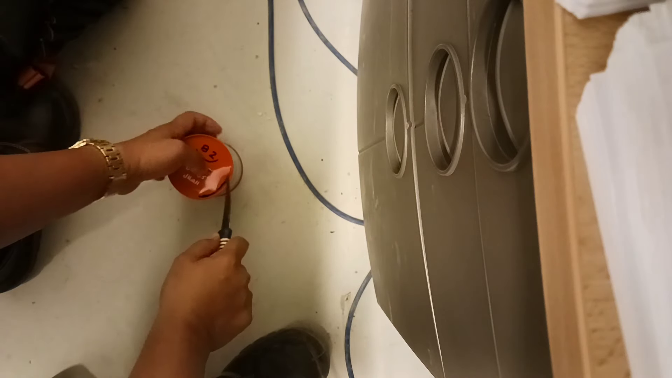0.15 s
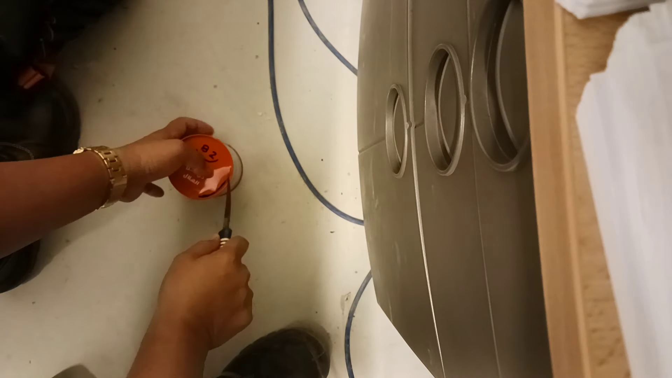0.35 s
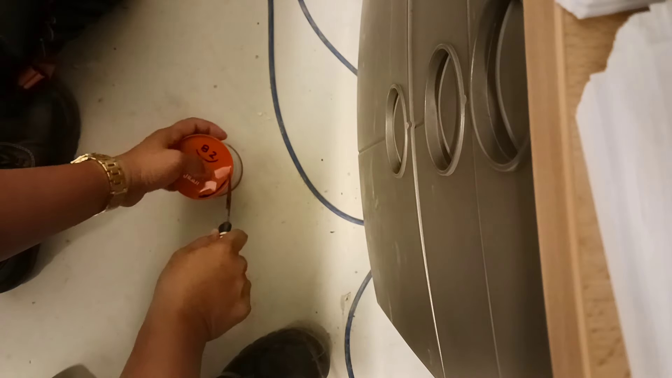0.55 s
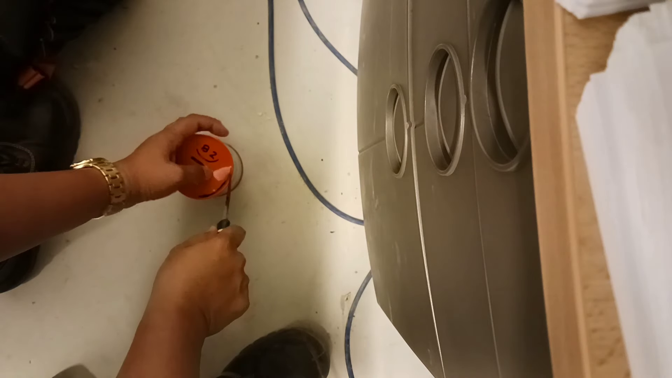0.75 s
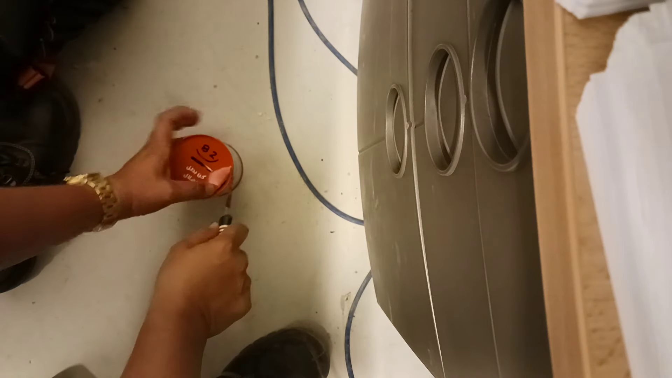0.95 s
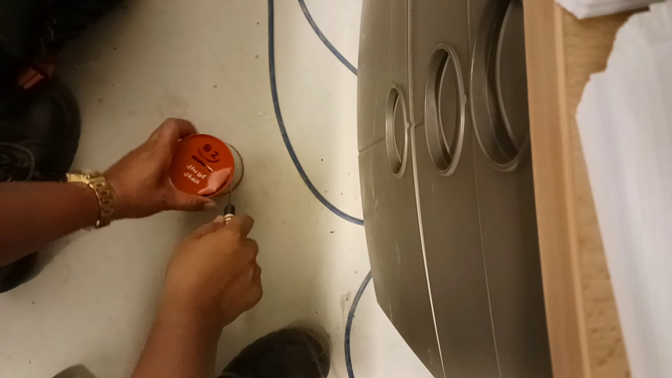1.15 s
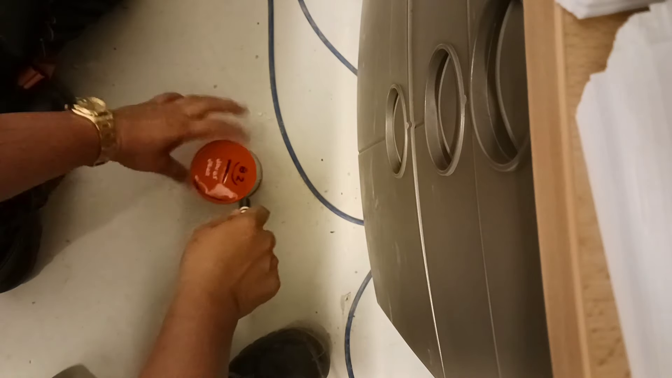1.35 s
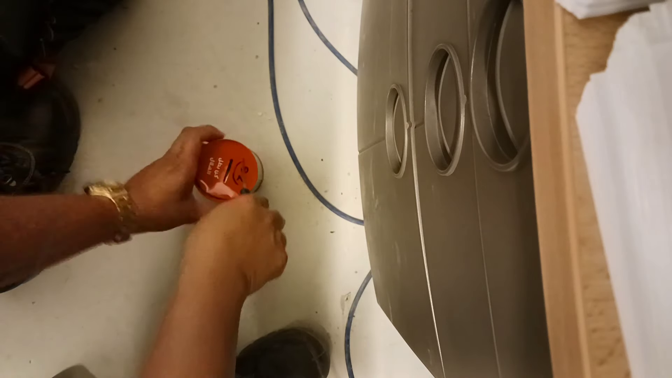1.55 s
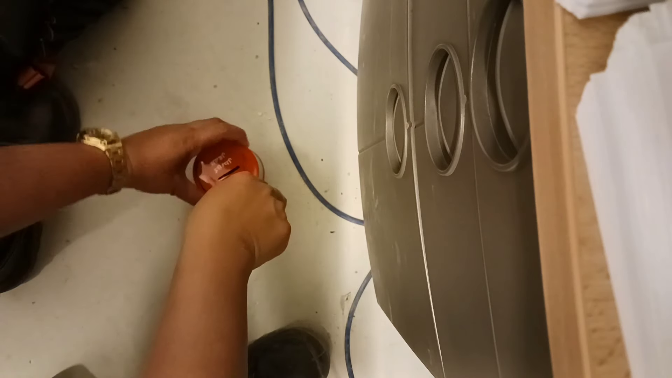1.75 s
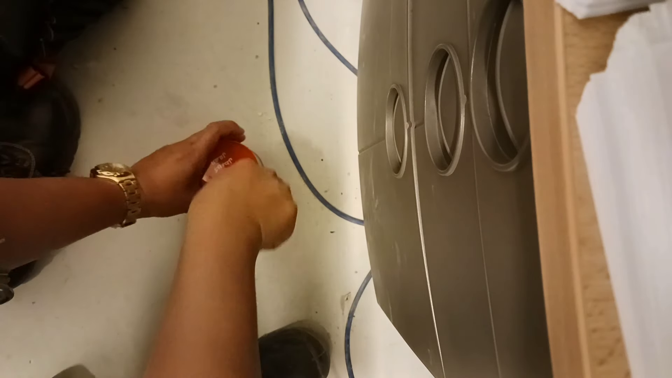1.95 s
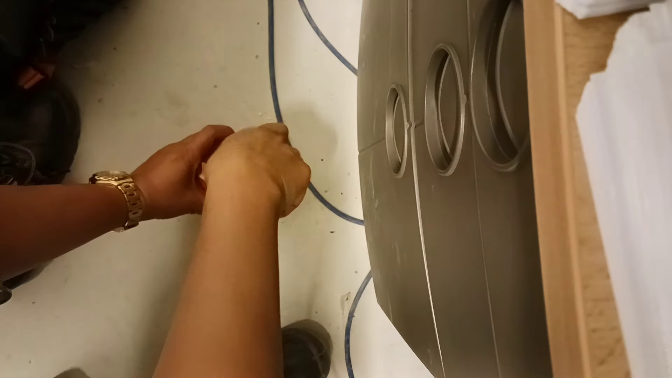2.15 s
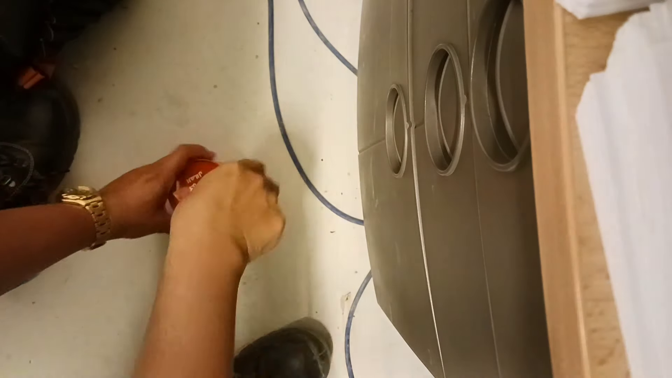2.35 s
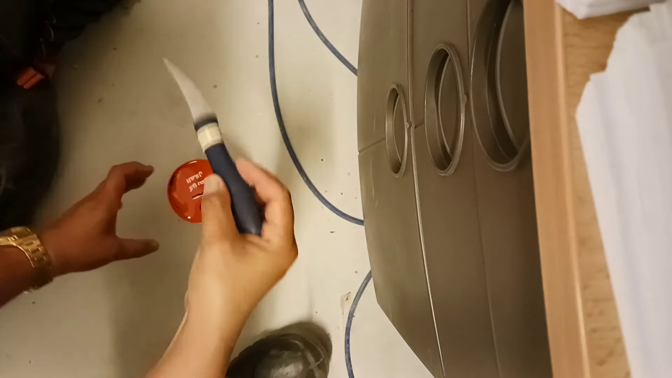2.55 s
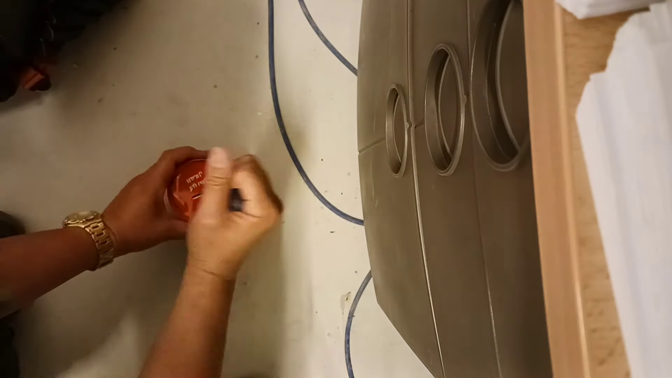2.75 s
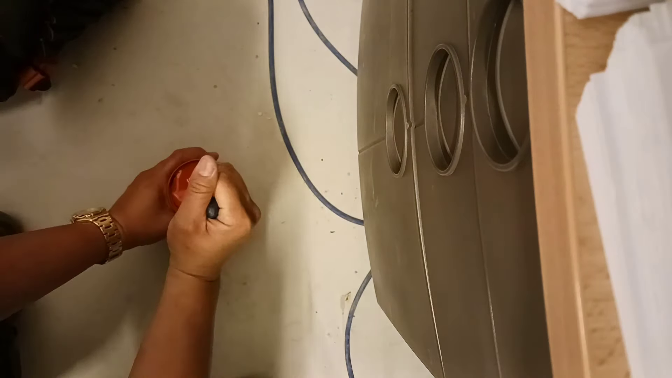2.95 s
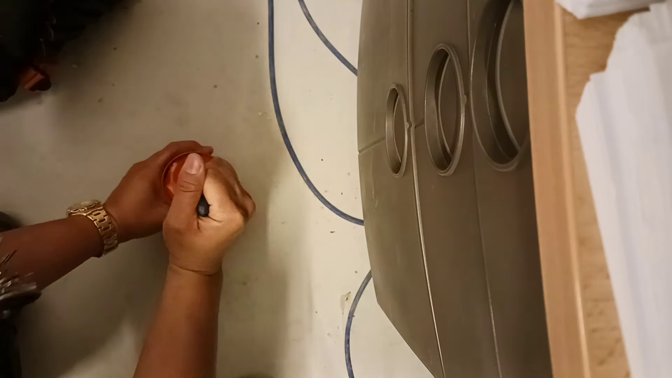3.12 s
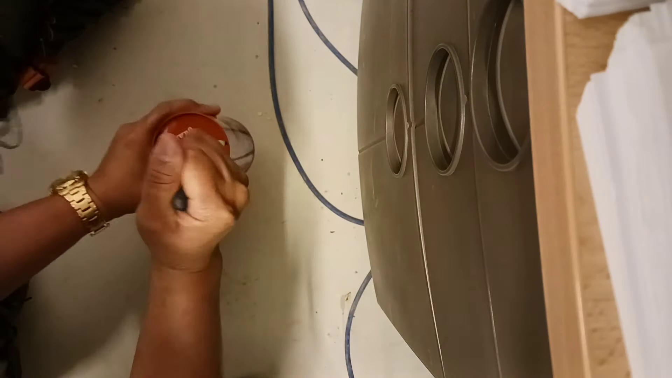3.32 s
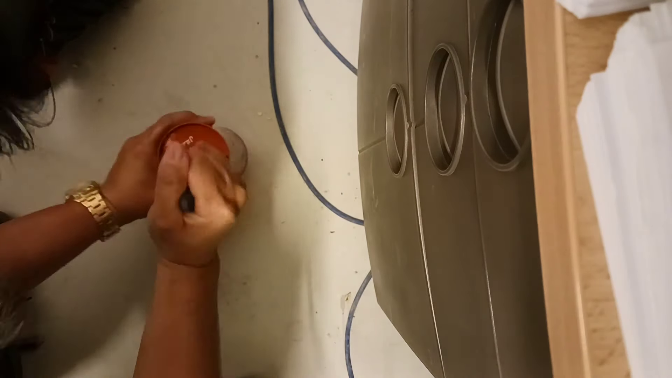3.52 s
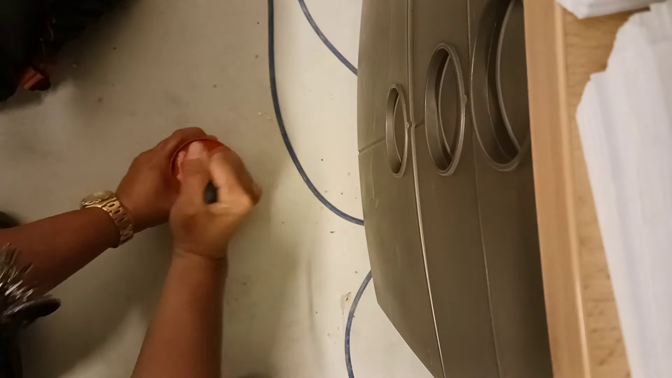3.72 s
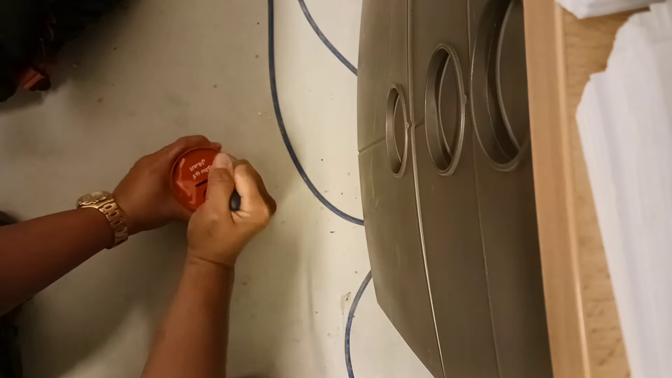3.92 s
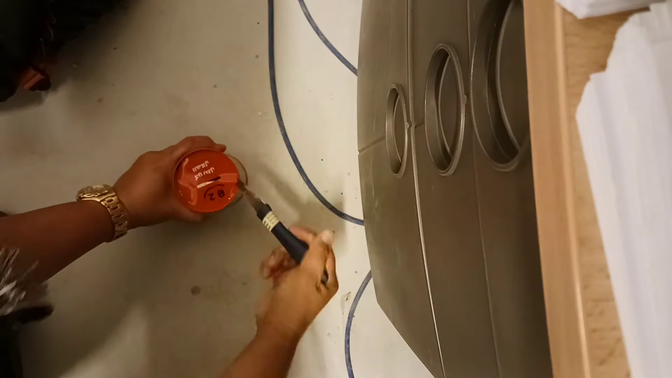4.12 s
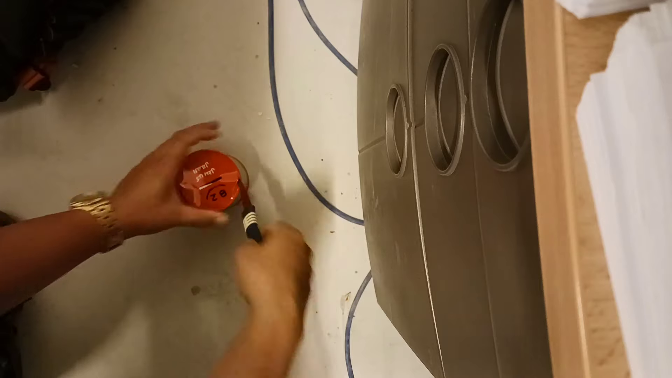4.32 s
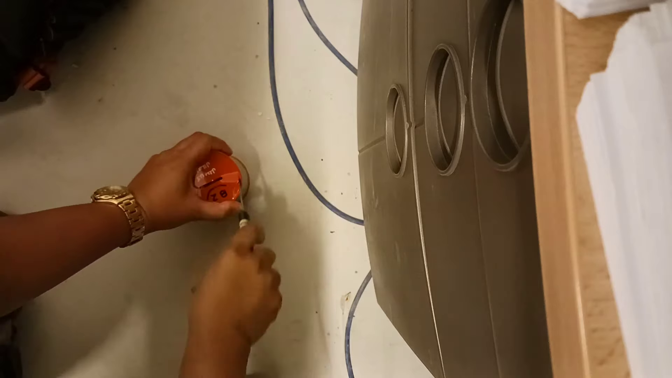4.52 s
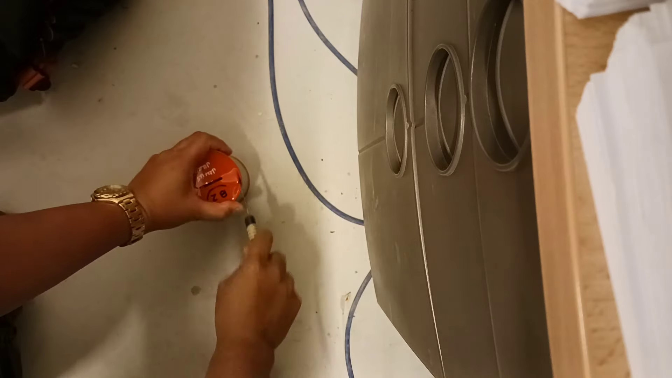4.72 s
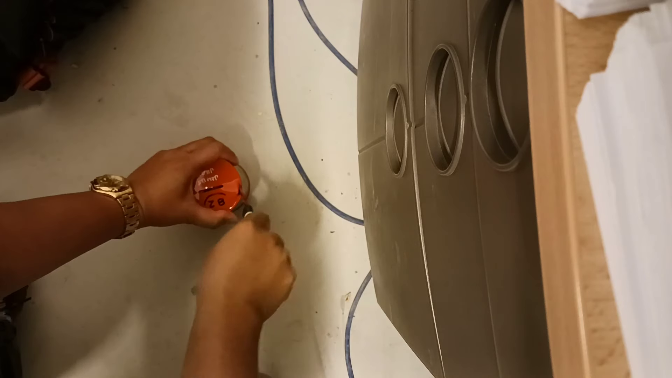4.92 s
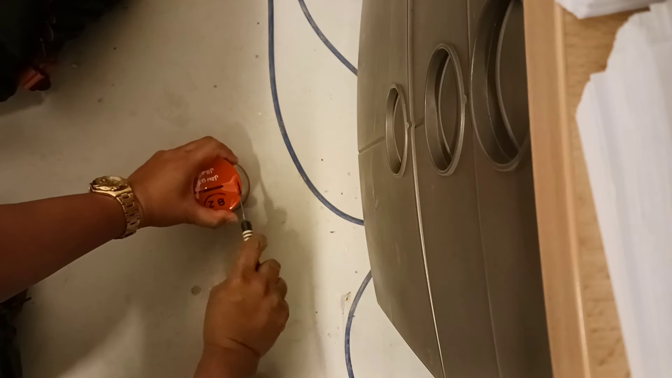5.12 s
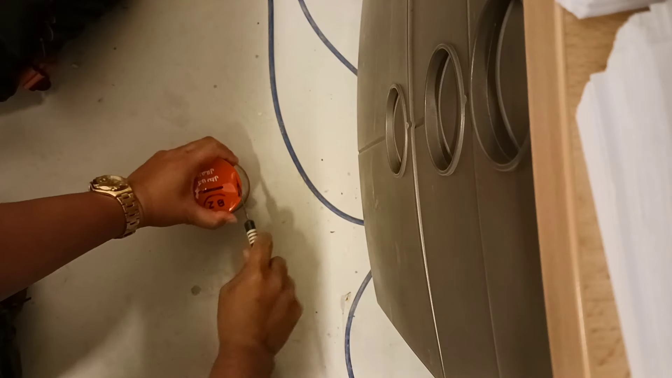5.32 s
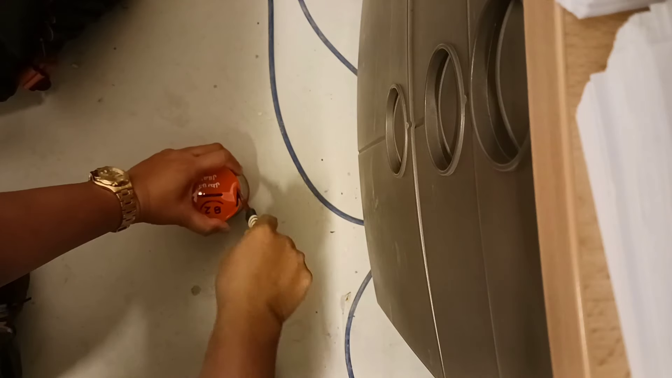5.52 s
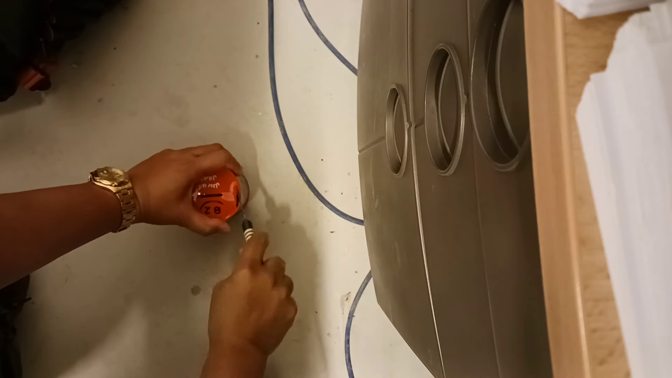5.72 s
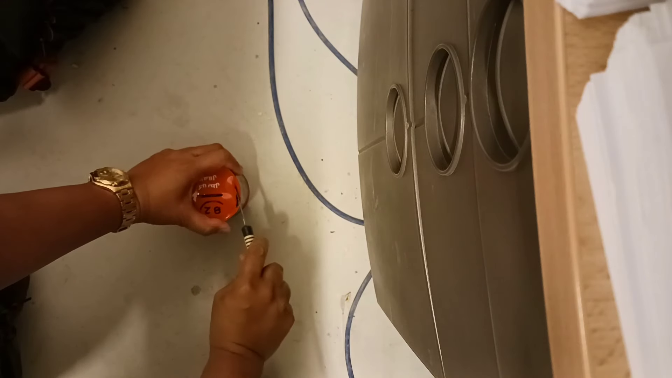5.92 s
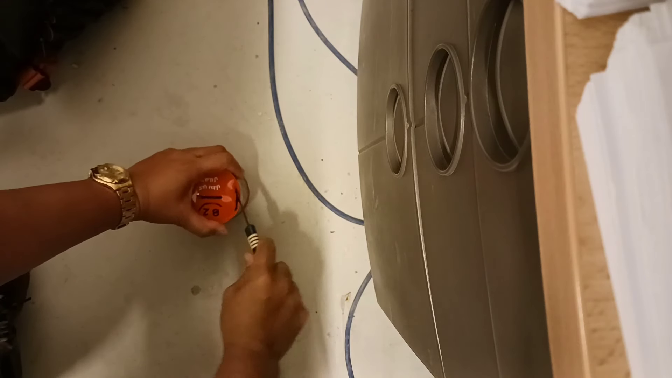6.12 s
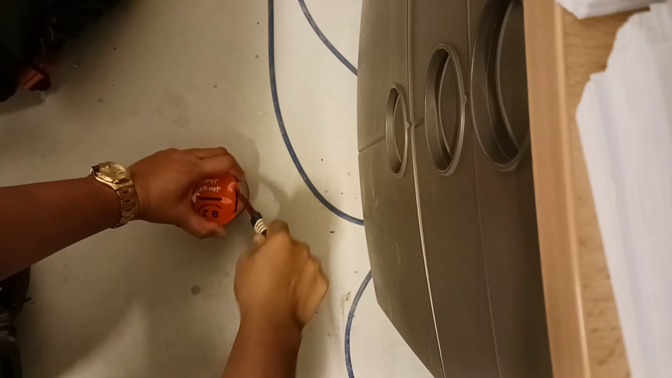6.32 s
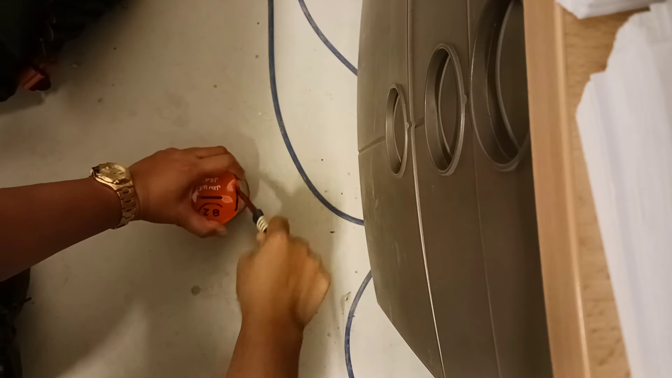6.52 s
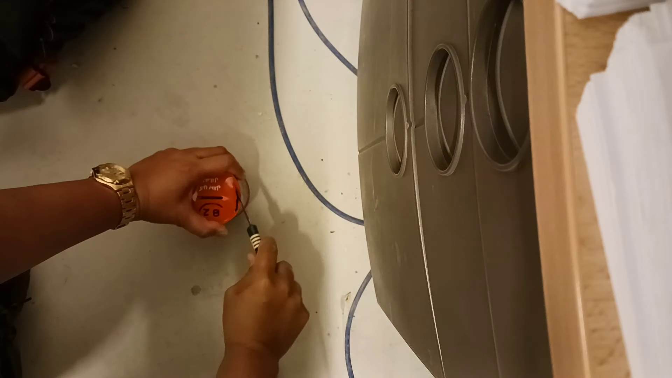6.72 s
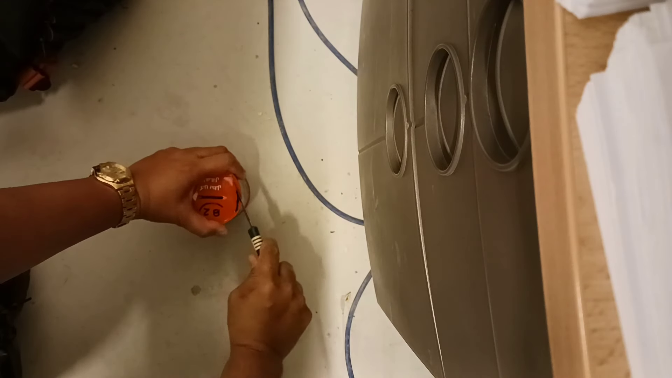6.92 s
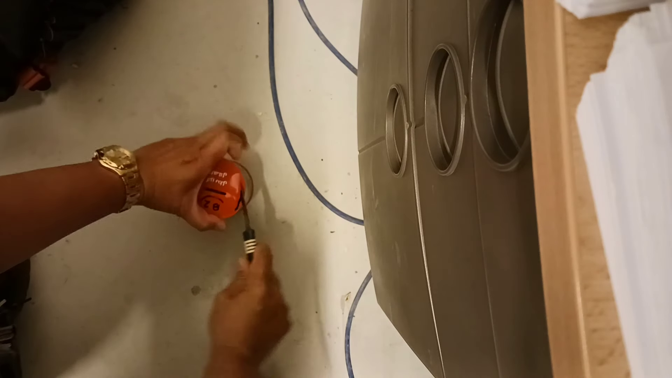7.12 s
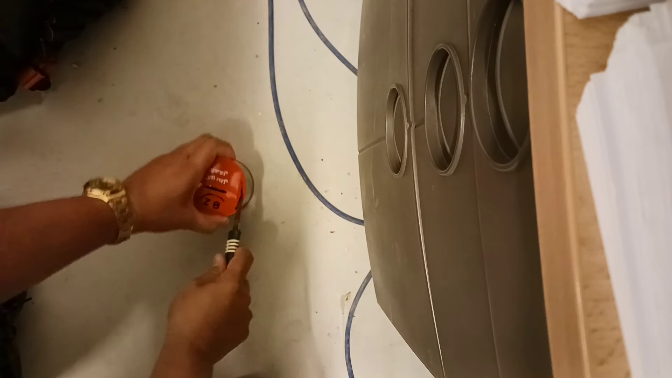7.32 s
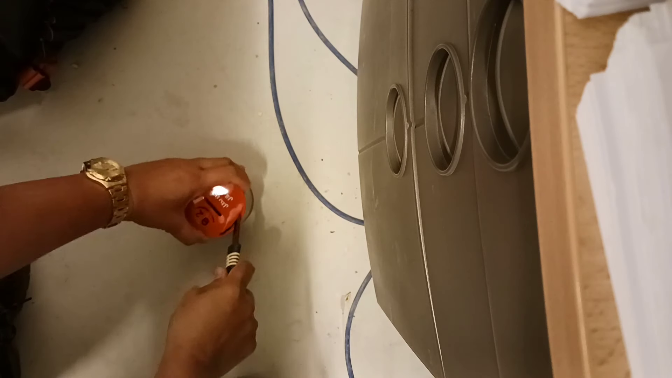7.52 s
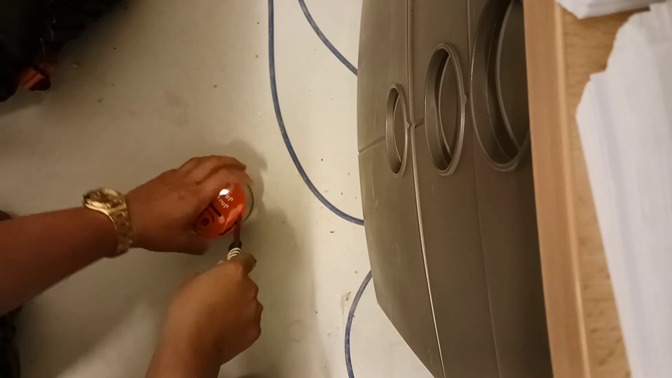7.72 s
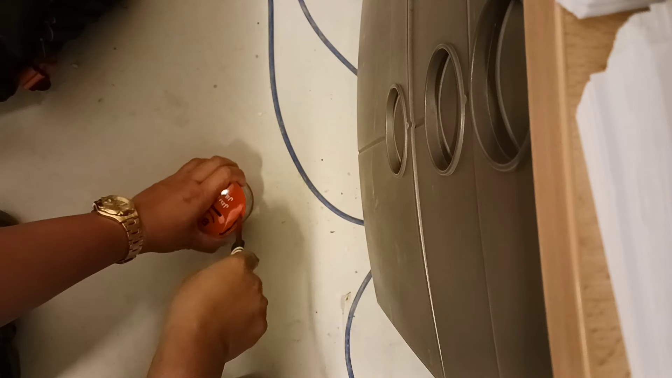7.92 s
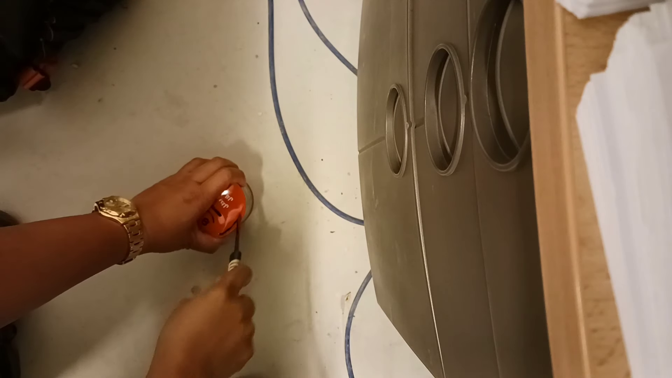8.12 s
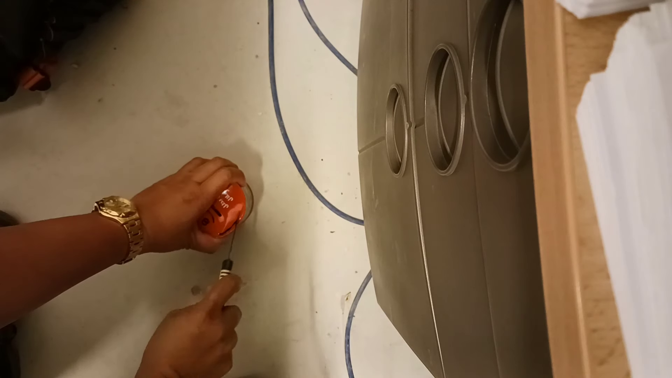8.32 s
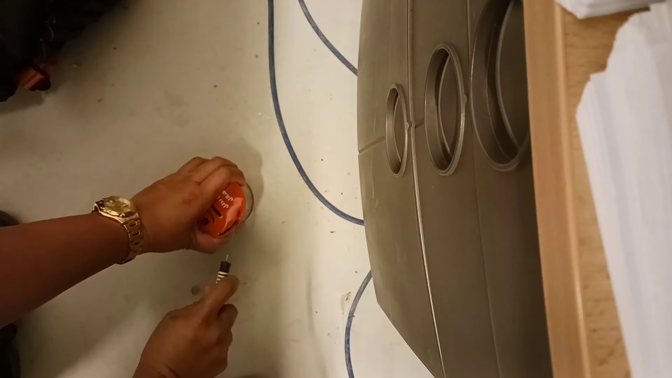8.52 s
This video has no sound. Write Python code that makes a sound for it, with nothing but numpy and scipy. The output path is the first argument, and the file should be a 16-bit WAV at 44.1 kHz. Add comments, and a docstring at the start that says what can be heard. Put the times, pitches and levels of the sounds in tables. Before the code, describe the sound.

A knife picks faintly at a stiff tin lid, then four hard metallic jabs, one sharp slipping scrape and gritty tin shuffles over an appliance hum.

```python
"""Knife at a stiff tin lid

A small knife picks and scrapes at the lid of a tin held on a hard floor, and is jabbed into it four times.
Contacts are bursts of gritty noise that ring the blade, tin, rim or floor; lid pops are short damped sines.
A small room answers in decaying noise. An appliance hums behind as shaped noise, with drifting motor tones.
The phone's gain control ducks under loud sound, waits, then recovers."""
import sys
import numpy as np
from scipy import signal
from scipy.fft import rfft, irfft, next_fast_len
from scipy.io import wavfile
from scipy.ndimage import uniform_filter1d, minimum_filter1d

SR = 44100
rng = np.random.default_rng(int(sys.argv[2]) if len(sys.argv) > 2 else 0)


def store_pcm(level_fs):
    """Save levels as 16-bit WAV."""
    pcm = np.round(np.clip(level_fs, -1, 1) * 32767).astype(np.int16)
    wavfile.write(sys.argv[1], SR, np.atleast_2d(pcm).T)


N = 377496

# Room background spectrum: (frequency [Hz], relative density [dB per Hz])
AIR_SPECTRUM = [(20, -10.5), (45, -0.5), (110, -1.5), (200, -6.5), (380, -1), (800, -2), (1050, -9.5),
                (2300, -16.5), (2900, -20.5), (4300, -21), (4800, -25), (7000, -24.5), (8200, -30.5),
                (16000, -30)]
# Resonances of the appliance's hum: (frequency [Hz], width [Hz], lift [dB])
HUM_RESONANCES = [(64.45, 7, 16), (89.5, 2.3, 11.5), (563.8, 32, 0.5), (563, 20, 6), (4200, 160, 3)]
# Motor whine: (frequency [Hz], RMS level [dB])
WHINE_TONES = [(612, -69.5), (1828, -78.5), (2410, -84.5)]
# Reverberation time of the room's late tail: (frequency [Hz], T60 [s])
ROOM_LATE_T60 = [(200, 0.93), (1000, 0.76), (3000, 0.58), (7000, 0.53), (14000, 0.41)]

# Dense ring of the tin: (frequency [Hz], response [dB])
TIN_RESPONSE = [(100, -23), (300, -18.5), (500, -3.5), (900, 2), (2100, 3), (3200, 3), (5400, -0.5),
                (7300, -5), (12000, -5.5), (16000, -11)]
# Tin modes standing out of it: (frequency [Hz], width [Hz], lift [dB])
TIN_RESONANCES = [(478, 55, 7.5), (1220, 32, 5.5), (1760, 49, 4.5), (2080, 26, 9), (2247, 28, 6.5),
                  (2500, 22, 4.5), (2975, 22, 0), (4460, 42, 2.5), (5000, 140, 3.5), (5700, 130, 2.5)]
# Dense ring of the steel blade: (frequency [Hz], response [dB])
BLADE_RESPONSE = [(200, -21.5), (600, -10), (1400, -10), (2100, -3.5), (5000, -3.5), (7500, -7.5),
                  (16000, -13)]
# Blade modes standing out of it: (frequency [Hz], width [Hz], lift [dB])
BLADE_RESONANCES = [(2190, 77, 9), (3350, 66, 6.9), (3330, 19, 2.5), (3920, 78, 2.2), (4190, 41, 2.26),
                    (4700, 310, 3.3), (7020, 78, 7.1)]

# Soft thuds of hands, knees and tin on the floor, and low swells of the hum near 75 Hz: (time [s], level [dB],
# rise [s], fall [s], resonance [Hz])
SOFT_BUMPS = [(.020, -47.5, 0.0023, 0.013, 505), (1.24, -48, 0.046, 0.068, 774),
              (1.322, -51.5, 0.023, 0.048, 73), (2.28, -53, 0.051, 0.26, 158),
              (2.401, -54, 0.088, .24, 78.5), (2.917, -42, 0.0026, 0.012, 460),
              (3.068, -45, .005, 0.012, 520), (4.715, -50, 0.014, 0.042, 700),
              (4.925, -53, 0.0045, 0.056, 605)]
# Knife tip catching on the rim: (time [s], level [dB], tilt [dB/octave], lid note [Hz])
TIP_CLICKS = [(.0220, -45.5, 2, 5200), (.1650, -48, -3.5, 2000), (0.231, -51, 5.5, 3800),
              (1.6855, -40, 4.5, 3130), (2.3419, -28, 7.5, 10000), (2.917, -32, 2.5, 2060),
              (4.0786, -34.5, -1, 1490), (4.7455, -41.5, 7.5, 3300), (4.9282, -42.5, -0.5, 1300),
              (4.9931, -37, 1.5, 3070), (6.467, -50, 0.5, 2245), (7.141, -50.5, 2, 2795),
              (8.3895, -49, -5.5, 2740), (8.43, -41.5, 1.5, 2760)]
# Light picking under the rim: (time [s], level [dB], fall [s])
LIGHT_SCRATCHES = [(.135, -63, 0.13), (.93, -65, 0.069), (1.69, -52.5, 0.038), (3.069, -54, 0.015),
                   (4.261, -46, 0.01), (4.341, -48, 0.016), (4.711, -60.5, 0.11), (4.911, -54, 0.13),
                   (5.15, -58, .03), (5.33, -56, 0.065), (5.385, -55.5, 0.032), (5.58, -61, 0.18),
                   (5.777, -47, .066), (8.436, -58, .07)]
# Blade, levered hard, slipping off the rim in jerks: (time [s], level [dB], rise [s])
HARD_SLIPS = [(6.520, -36.5, 0.0059), (6.550, -26.5, 0.025), (6.5685, -19, 0.00053), (6.583, -18.5, 0.0023)]
# Tin shifting over the floor, and a hand sliding across the lid at 1.18 s: (time [s], level [dB], rise [s],
# fall [s], tilt [dB/octave], favoured note [Hz])
SLIDES = [(1.001, -57.5, 0.042, 0.049, -4, 806), (1.18, -52.5, 0.15, .035, -0.7, 10900),
          (2.222, -52.5, 0.024, 0.14, 2, 1080), (6.999, -59.5, 0.067, 0.54, 2, 1830),
          (7.222, -46, 0.0032, 0.043, -1, 1790), (7.362, -35, 0.042, 0.031, 0, 1020),
          (7.42, -41.5, 0.012, 0.055, -1.5, 1830), (7.58, -57.5, 0.2, 0.084, 2, 1750)]
# Thin lid flexing and popping: (time [s], note [Hz], level [dB], fall [s])
LID_POPS = [(1.6863, 1350, -30, 0.0032), (1.6862, 4600, -39, 0.0027), (2.9155, 1277, -26, 0.0055),
            (2.9184, 1720, -29.5, 0.0081)]
# Flat of the blade drawn across the lid: (time [s], level [dB], rise [s], fall [s])
BLADE_SWEEPS = [(2.514, -39, 0.063, .022), (2.583, -28, .008, 0.031)]
# Knife jabbed into the lid: (time [s], bite level [dB], bite rise [s], length [s], bite tilt [dB/octave],
# lid note [Hz], direct sound [dB], skid level re bite [dB], skid note [Hz])
KNIFE_BLOWS = [(3.3560, -9, 0.0014, 0.016, 0.1, 2050, -3.5, -12, 1050),
               (3.5423, -5, 0.0011, 0.0063, -3, 1280, 3.5, -5.5, 2600),
               (3.679, 1, 0.0048, .016, -0.16, 2760, 1.5, -14.5, 2900),
               (3.831, -2, 0.013, 0.013, -1.8, 1930, -6, -6.5, 4200)]
# Rim singing as the blade is drawn along it: (time [s], level [dB], rise [s], fall [s])
RIM_SQUEALS = [(7.22, -47, 0.0062, 0.024), (7.386, -40, 0.023, 0.02), (7.6, -56, 0.13, 0.057)]

PORT_GAP_M, SOUND_SPEED_M_S = 0.12, 343  # the phone's two microphone ports
TOP_HZ = 16000

# sliding and jabbing also drive the floor under the tin
FLOOR_HZ, SLIDE_FLOOR_DB, BLOW_FLOOR_DB = 570, -5.5, -31.5
CLICK_FALL_S, CLICK_NOTE_DB = 0.0044, 9.5
SCRATCH_RISE_S, SCRATCH_TILT_DB_PER_OCT = 0.0037, -2.5
SCRATCH_NOTE_HZ, SCRATCH_NOTE_DB = 2150, 1
SLIP_FALL_S, SLIP_NOTE_HZ, SLIP_NOTE_DB = 0.0086, 4700, 2.5
# a slip with the even rise is untilted; each halving of the rise brightens it by this tilt
SLIP_EVEN_RISE_S, SLIP_TILT_DB_PER_OCT = 0.019, 0.37
SLIDE_NOTE_DB = 8.5
SWEEP_TILT_DB_PER_OCT, SWEEP_NOTE_HZ, SWEEP_NOTE_DB = -0.5, 2340, 4
# shares of a jab's length
BITE_FALL_SHARE, SKID_DELAY_SHARE, SKID_RISE_SHARE = 0.43, 0.72, 0.33
BITE_NOTE_DB, BITE_DAMPING = 6.5, 0.12
SKID_TILT_DB_PER_OCT, SKID_NOTE_DB, SKID_DAMPING = 0, 8.5, 0.3


def undb(db):
    """Decibels to gain."""
    return 10 ** (np.asarray(db) / 20)


def rms(x):
    """Root mean square, kept above zero."""
    return np.sqrt(np.mean(x ** 2)) + 1e-12


def along(points, hz):
    """Read (frequency [Hz], value) points on a log-frequency axis."""
    point_hz, value = np.transpose(points)
    return np.interp(np.log(hz), np.log(point_hz), value)


def grid(size):
    """Frequencies in Hz of a real spectrum, kept above zero."""
    return np.maximum(np.arange(size // 2 + 1) * SR / size, 1)


def resonances(modes, hz):
    """Lift in dB of resonances that stand on a broad response."""
    power = 1
    for mode_hz, width_hz, lift_db in modes:
        peak = undb(abs(lift_db)) ** 2 - 1
        power = power + peak / (1 + (2 * (hz - mode_hz) / width_hz) ** 2)
    return 10 * np.log10(power)


def tin_body(hz):
    """Response in dB of the tin: dense ring plus modes."""
    return along(TIN_RESPONSE, hz) + resonances(TIN_RESONANCES, hz)


def blade_body(hz):
    """Response in dB of the blade: dense ring plus modes."""
    return along(BLADE_RESPONSE, hz) + resonances(BLADE_RESONANCES, hz)


def voiced(body_db, hz, tilt_db_per_oct, note_hz, note_db, damping):
    """Harder contact tilts the response up; the spot touched favours one note, damped by the hand."""
    tilt_db = tilt_db_per_oct * np.log2(np.maximum(hz, 300) / 2000)
    return body_db + tilt_db + resonances([(note_hz, damping * note_hz, note_db)], hz)


def ring(force, response_db):
    """Drive a causal, minimum-phase body; the ring follows the push."""
    size = len(force)
    cepstrum = irfft(np.log(undb(response_db)))
    cepstrum[1:size // 2] *= 2  # fold onto positive time
    cepstrum[size // 2 + 1:] = 0
    return irfft(rfft(force) * np.exp(rfft(cepstrum)))


def contact(response_db, level_db, rise_s, fall_s, grit_db, slip_db, slip_hz):
    """Tiny impacts, bunched by stick and slip, swell and die away while they drive a body."""
    size = 2 * (len(response_db) - 1)
    t = np.arange(size) / SR
    decay = np.exp(-np.maximum(t - rise_s, 0) / fall_s)
    pressure = np.where(t < rise_s, t / rise_s, decay)
    impacts, sizes, slips = rng.standard_normal((3, size))
    stick_slip = np.interp(t * slip_hz, np.arange(size), slips)
    roughness_db = max(grit_db, 0) * sizes + max(slip_db, 0) * stick_slip
    sound = ring(pressure * impacts * undb(roughness_db), response_db)
    return sound * undb(level_db) * rms(pressure) / rms(sound)


def add(track, time_s, sound):
    """Mix a sound in at a time."""
    start = max(int(time_s * SR), 0)
    part = sound[..., :max(N - start, 0)]
    track[..., start:start + part.shape[-1]] += part


def strokes(table, body, damping, grit_db, slip_db, slip_hz, size=32768):
    """Friction strokes on one body, each with its own tilt and note."""
    hz, out = grid(size), np.zeros(N)
    body_db = body(hz)
    for time_s, level_db, rise_s, fall_s, tilt_db_per_oct, note_hz, note_db in table:
        response_db = voiced(body_db, hz, tilt_db_per_oct, note_hz, note_db, damping)
        add(out, time_s, contact(response_db, level_db, rise_s, fall_s, grit_db, slip_db, slip_hz))
    return out


def at_phone(x, lag_s, far_db, shadow_hz):
    """Direct sound meets the left port first; the right one lies in the phone's shadow and loses treble."""
    pole = np.exp(-2 * np.pi * shadow_hz / SR)
    delayed = np.pad(x, (int(lag_s * SR), 0))[:N]
    far = signal.lfilter([1 - pole], [1, -pole], delayed)
    return np.array([x, undb(far_db) * far])


def diffuse(size):
    """Spectra of noise from all sides at the two ports: long waves reach both alike."""
    left, other = rfft(rng.standard_normal((2, size)))
    alike = np.sinc(2 * grid(size) * PORT_GAP_M / SOUND_SPEED_M_S)
    return np.array([left, alike * left + np.sqrt(1 - alike ** 2) * other])


def room(x, early_db, late_db, early_t60_s, soak_db_per_s=70, size=32768):
    """Dense early reflections off floor and furniture, then a longer tail that loses its treble first."""
    t, hz = np.arange(size) / SR, grid(size)
    centres_hz = 125 * 2.0 ** np.arange(8)
    early, late = diffuse(size), diffuse(size)
    response = 0
    for centre_hz, share in zip(centres_hz, np.eye(len(centres_hz))):
        band = np.interp(np.log(hz), np.log(centres_hz), share)
        # soak speeds the early decay in proportion to frequency
        soak_db = soak_db_per_s * t * centre_hz / centres_hz[-1]
        near = irfft(early * band) * undb(early_db - 60 * t / early_t60_s - soak_db)
        far = irfft(late * band) * undb(late_db - 60 * t / along(ROOM_LATE_T60, centre_hz))
        left_db = along([(500, -8.5), (2000, -0.4), (12000, -1.4)], centre_hz)
        right_db = along([(500, -1.5), (2000, 2.5), (5000, 0.7), (12000, -10.0)], centre_hz)
        response = response + (near + far) * undb([[left_db], [right_db]])
    onset = np.clip((t - 0.003) / 0.0075, 0, 1)  # the first walls are a step away
    response *= onset / np.sqrt(SR / 50)
    return signal.fftconvolve(x[None], response, axes=1)[:, :N]


def background(level_db=-57.5, waver_db=1.6, lag_s=0.0003):
    """An appliance runs: its bass reaches both ports alike, the left first, and the rest is diffuse."""
    size = 2 * next_fast_len(N // 2 + 1)
    hz = grid(size)
    common, left, right = rfft(rng.standard_normal((3, size)))
    direct = np.array([common, common * np.exp(-2j * np.pi * hz * lag_s)])
    alike = np.clip(along([(90, 0.88), (280, 0.98), (550, 0.22), (1000, 0.018)], hz), 0, 1)
    ports = np.sqrt(alike) * direct + np.sqrt(1 - alike) * np.array([left, right])
    # left over right
    lean_db = along([(70, 6.1), (150, 5.1), (600, 2.6), (3000, 0.89), (10000, 10)], hz)
    ports = ports * undb(np.array([lean_db, -lean_db]) / 2)
    spectrum_db = along(AIR_SPECTRUM, hz) + resonances(HUM_RESONANCES, hz)
    air = irfft(ports * undb(spectrum_db))[:, :N]
    # four random levels a second
    waver = np.interp(np.arange(N) / SR * 4, np.arange(100), rng.standard_normal(100))
    return air / rms(air) * undb(level_db + waver_db * waver)


def whine(drift_hz=0.8):
    """Thin motor tones that drift slightly and reach each port in a different phase."""
    t, out = np.arange(N) / SR, 0
    port_cycles = np.array([[0], [1 / 6]])
    for tone_hz, level_db in WHINE_TONES:
        drift = np.interp(t * 2, np.arange(40), rng.standard_normal(40))
        cycles = np.cumsum(tone_hz + drift_hz * drift) / SR
        phase = 2 * np.pi * (cycles + rng.random() + port_cycles)
        out = out + np.sqrt(2) * undb(level_db) * np.sin(phase)
    return out


def bumps(size=16384):
    """Soft thuds, and low swells of the hum, are noise through one low, broad resonance; every slide and jab
    adds one."""
    hz, out = grid(size), np.zeros(N)
    dragged = [(time_s, level_db + SLIDE_FLOOR_DB, rise_s, fall_s, FLOOR_HZ)
               for time_s, level_db, rise_s, fall_s, *_ in SLIDES]
    struck = [(time_s, level_db + BLOW_FLOOR_DB, rise_s, length_s, FLOOR_HZ)
              for time_s, level_db, rise_s, length_s, *_ in KNIFE_BLOWS]
    for time_s, level_db, rise_s, fall_s, resonance_hz in SOFT_BUMPS + dragged + struck:
        response_db = -20 * np.log10(1 + 2.5 * (hz / resonance_hz - resonance_hz / hz) ** 2)
        add(out, time_s, contact(response_db, level_db, rise_s, fall_s, grit_db=1.5, slip_db=3, slip_hz=40))
    return out


def clicks(size=4096):
    """The tip snaps off the rim and the held tin gives a short note."""
    hz, out = grid(size), np.zeros(N)
    tin_db = tin_body(hz)
    for time_s, level_db, tilt_db_per_oct, note_hz in TIP_CLICKS:
        response_db = voiced(tin_db, hz, tilt_db_per_oct, note_hz, CLICK_NOTE_DB, damping=0.094)
        click = contact(response_db, level_db, rise_s=0.001, fall_s=CLICK_FALL_S,
                        grit_db=4.0, slip_db=1.5, slip_hz=925)
        add(out, time_s, click)
    return out


def scrapes():
    """The blade's edge on the rim: light scratches of one tone; hard slips, brighter the more sudden."""
    table = []
    for time_s, level_db, fall_s in LIGHT_SCRATCHES:
        table.append((time_s, level_db, SCRATCH_RISE_S, fall_s,
                      SCRATCH_TILT_DB_PER_OCT, SCRATCH_NOTE_HZ, SCRATCH_NOTE_DB))
    for time_s, level_db, rise_s in HARD_SLIPS:
        tilt_db_per_oct = SLIP_TILT_DB_PER_OCT * np.log2(SLIP_EVEN_RISE_S / rise_s)
        table.append((time_s, level_db, rise_s, SLIP_FALL_S, tilt_db_per_oct, SLIP_NOTE_HZ, SLIP_NOTE_DB))
    return strokes(table, blade_body, damping=0.15, grit_db=4, slip_db=3.5, slip_hz=300)


def slides():
    """The base of the tin grates over the floor; once, a hand rubs across the lid."""
    table = [(*row, SLIDE_NOTE_DB) for row in SLIDES]
    # negative grit counts as none
    return strokes(table, tin_body, damping=0.24, grit_db=-1.5, slip_db=2.5, slip_hz=258.3)


def pops(rise_s=0.00027, size=4096):
    """The lid snaps through and the fingers quickly damp its note."""
    t, out = np.arange(size) / SR, np.zeros(N)
    for time_s, note_hz, level_db, fall_s in LID_POPS:
        envelope = (1 - np.exp(-t / rise_s)) * np.exp(-t / fall_s)
        add(out, time_s, undb(level_db) * envelope * np.sin(2 * np.pi * note_hz * t))
    return out


def sweeps():
    """The flat of the blade rasps over the lid."""
    table = [(*row, SWEEP_TILT_DB_PER_OCT, SWEEP_NOTE_HZ, SWEEP_NOTE_DB) for row in BLADE_SWEEPS]
    return strokes(table, blade_body, damping=0.5, grit_db=5, slip_db=2, slip_hz=400)


def blows(size=16384):
    """The point bites the lid, then skids; hand and tin shift, so each contact meets the room differently."""
    hz, reflected, direct = grid(size), np.zeros((2, N)), np.zeros(N)
    tin_db = tin_body(hz)
    for (time_s, level_db, rise_s, length_s, tilt_db_per_oct,
         note_hz, direct_db, skid_db, skid_hz) in KNIFE_BLOWS:
        bite_response_db = voiced(tin_db, hz, tilt_db_per_oct, note_hz, BITE_NOTE_DB, BITE_DAMPING)
        skid_response_db = voiced(tin_db, hz, SKID_TILT_DB_PER_OCT, skid_hz, SKID_NOTE_DB, SKID_DAMPING)
        bite = (time_s, bite_response_db, level_db, rise_s, BITE_FALL_SHARE * length_s)
        skid = (time_s + SKID_DELAY_SHARE * length_s, skid_response_db,
                level_db + skid_db, SKID_RISE_SHARE * length_s, length_s)
        for start_s, *touch in (bite, skid):
            sound = contact(*touch, grit_db=7, slip_db=6, slip_hz=699)
            add(reflected, start_s, room(sound, early_db=0.5, late_db=-38.0, early_t60_s=0.24))
            add(direct, start_s, sound * undb(direct_db))
    return at_phone(direct, lag_s=0.0005, far_db=-11, shadow_hz=5000) + reflected


def squeals(rim_hz=1860, width_hz=32, size=32768):
    """Steady rubbing feeds one narrow mode of the rim."""
    out = np.zeros(N)
    response_db = -20 * np.log10(1 + ((grid(size) - rim_hz) / width_hz) ** 2)
    response_db = np.maximum(response_db, -60)
    for time_s, level_db, rise_s, fall_s in RIM_SQUEALS:
        add(out, time_s, contact(response_db, level_db, rise_s, fall_s, grit_db=1, slip_db=1, slip_hz=60))
    return out


def scene():
    """Knife and tin close by, in a small room."""
    ticks, snaps = clicks(), pops()
    blade, sweep, tin = scrapes(), sweeps(), slides() + squeals()
    close = at_phone(ticks + snaps + blade + sweep + tin, lag_s=0.00025, far_db=-47.0, shadow_hz=4970)
    low = at_phone(bumps(), lag_s=0.00033, far_db=-3.5, shadow_hz=2000)
    # each way of touching the tin throws its sound into the room differently
    tick_room = room(ticks + undb(-1.0) * snaps, early_db=-6, late_db=-21.5, early_t60_s=0.16)
    blade_room = room(blade, early_db=-5.5, late_db=-9.5, early_t60_s=0.134)
    tin_room = room(tin, early_db=-15.0, late_db=-11.0, early_t60_s=0.11)
    sweep_room = room(sweep, early_db=5.0, late_db=-25.5, early_t60_s=0.083)
    reflections = tick_room + blade_room + tin_room + sweep_room
    return background() + whine() + low + close + reflections + blows()


def gain_control(x, ceiling_db=-13, sense_s=0.0043, hold_s=0.51, release_db_per_s=48):
    """The gain drops at once under a loud sound, waits, then climbs back."""
    power = uniform_filter1d(np.mean(x ** 2, axis=0), int(sense_s * SR))
    cut_db = np.minimum(ceiling_db - 10 * np.log10(np.abs(power) + 1e-12), 0)
    half = int(hold_s * SR / 2)
    # origin sets the window over the past
    held_db = minimum_filter1d(cut_db, 2 * half + 1, origin=half, mode="nearest")
    climb_db = release_db_per_s * np.arange(N) / SR
    gain_db = np.minimum.accumulate(held_db - climb_db) + climb_db
    return x * undb(gain_db)


def record(dry):
    """The phone rides its gain, rounds the highest peaks and cuts the top."""
    rounded = np.tanh(gain_control(dry))
    low_pass = signal.ellip(8, 0.2, 70, TOP_HZ, fs=SR, output="sos")
    return signal.sosfilt(low_pass, rounded)


dry = scene()
out = record(dry)
store_pcm(out)
```